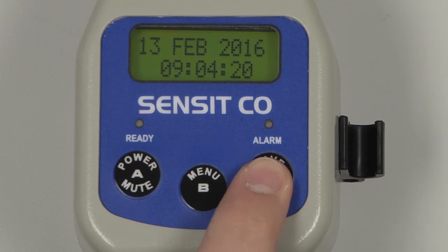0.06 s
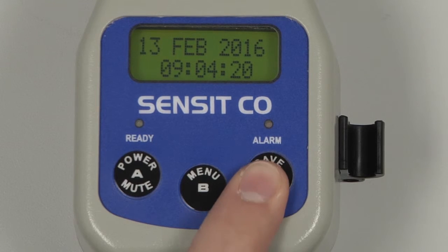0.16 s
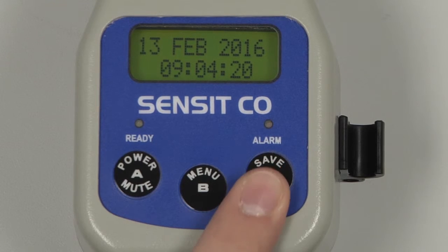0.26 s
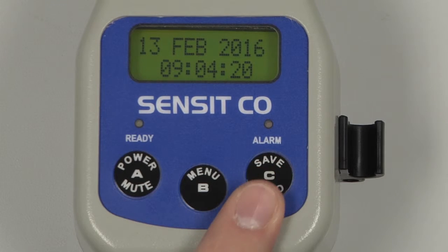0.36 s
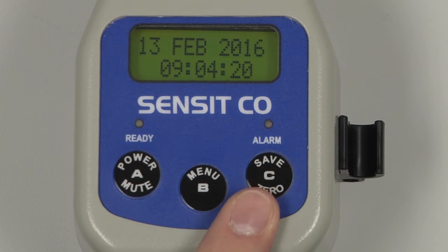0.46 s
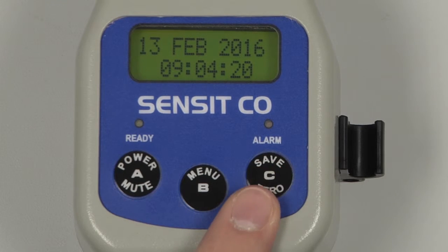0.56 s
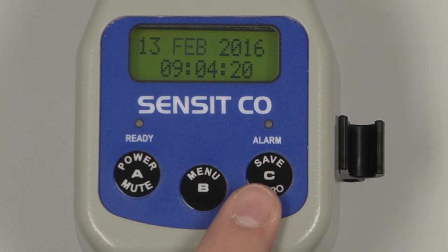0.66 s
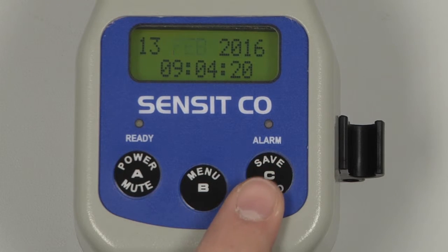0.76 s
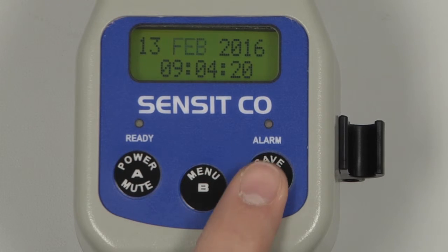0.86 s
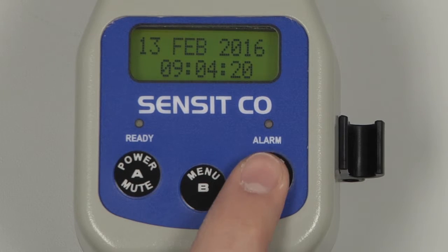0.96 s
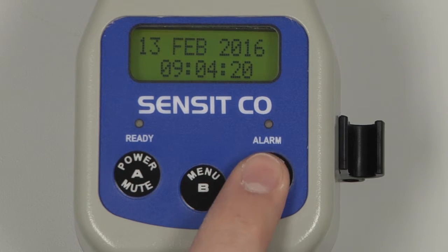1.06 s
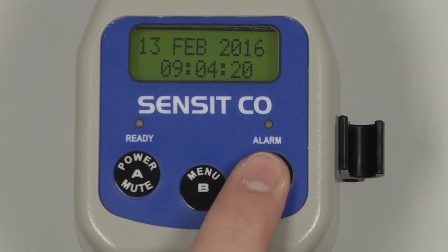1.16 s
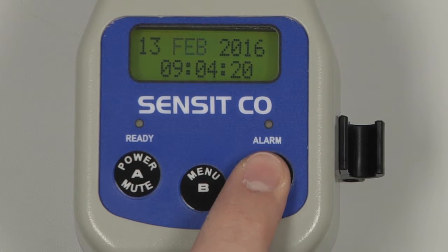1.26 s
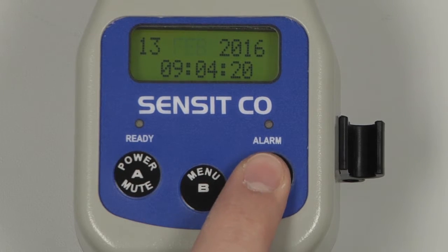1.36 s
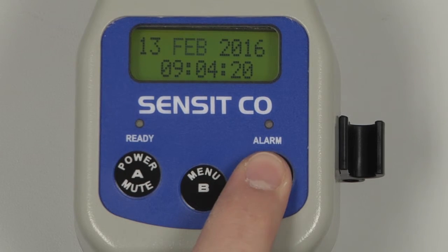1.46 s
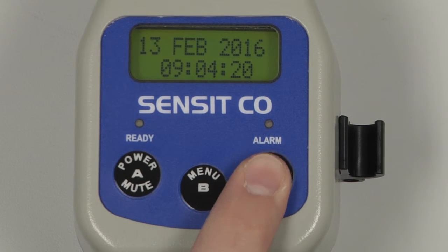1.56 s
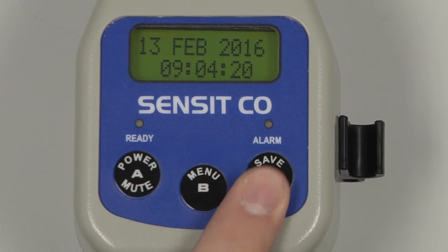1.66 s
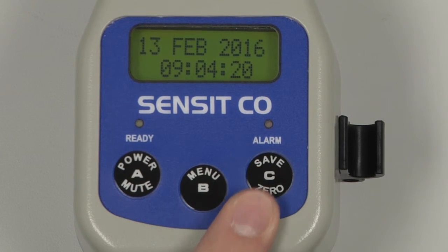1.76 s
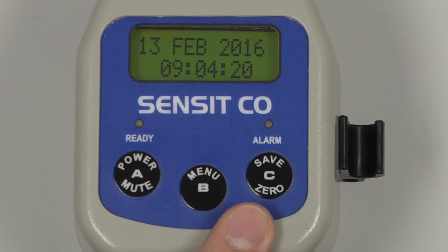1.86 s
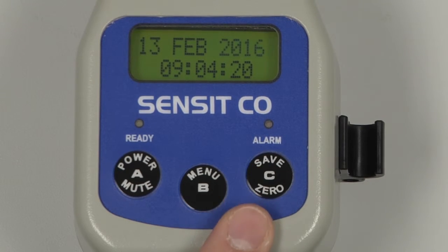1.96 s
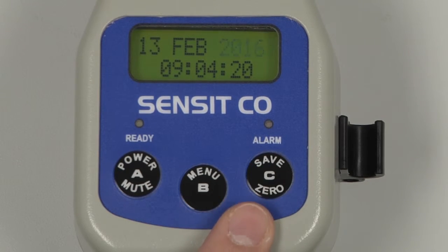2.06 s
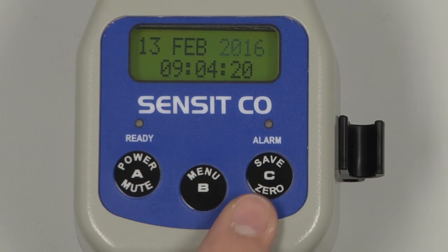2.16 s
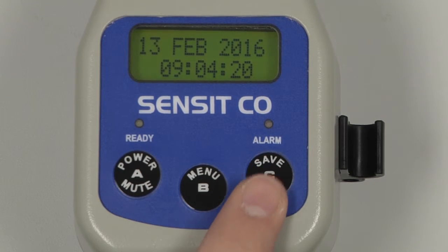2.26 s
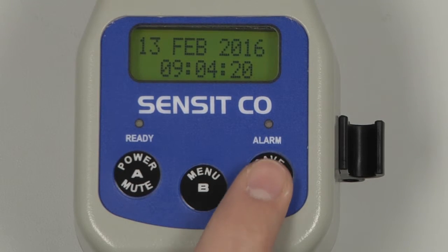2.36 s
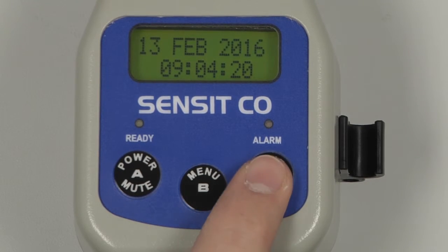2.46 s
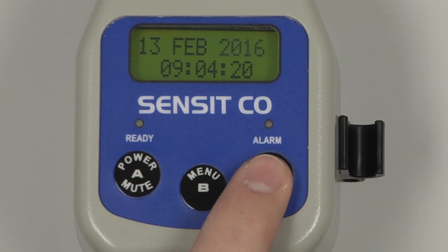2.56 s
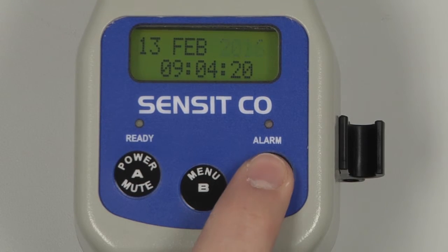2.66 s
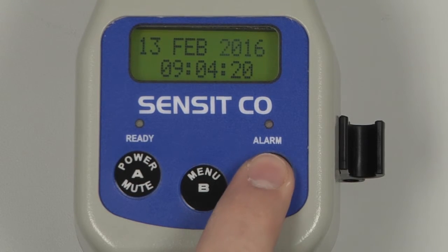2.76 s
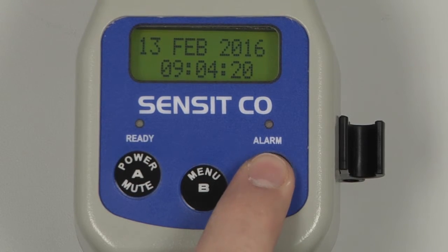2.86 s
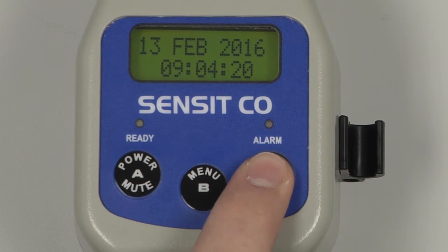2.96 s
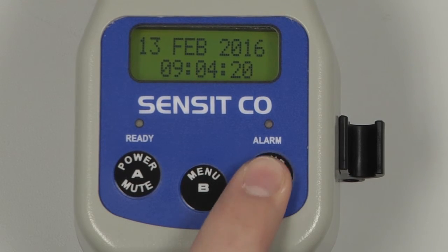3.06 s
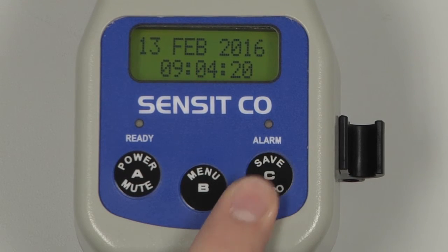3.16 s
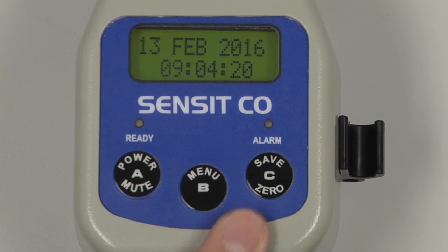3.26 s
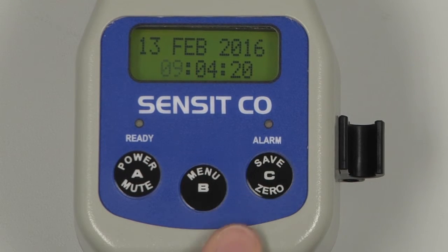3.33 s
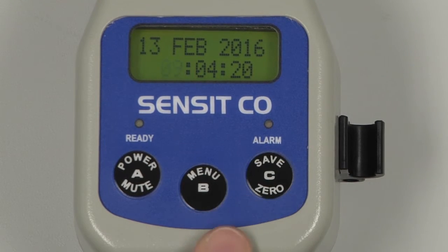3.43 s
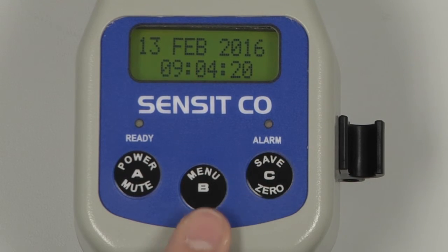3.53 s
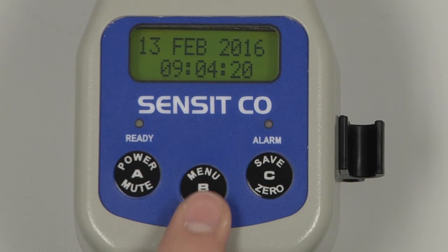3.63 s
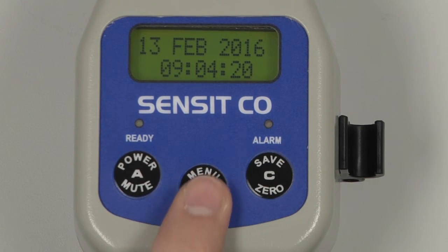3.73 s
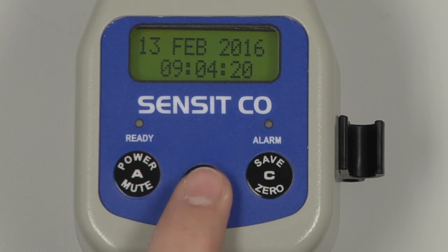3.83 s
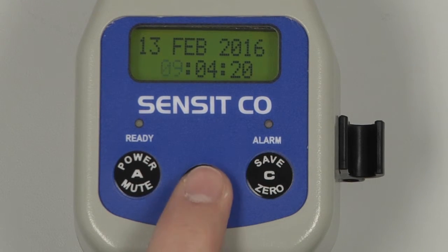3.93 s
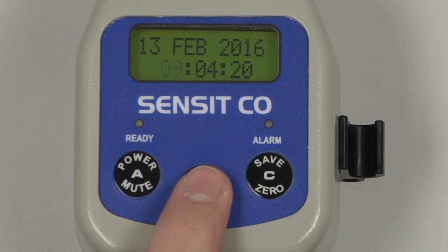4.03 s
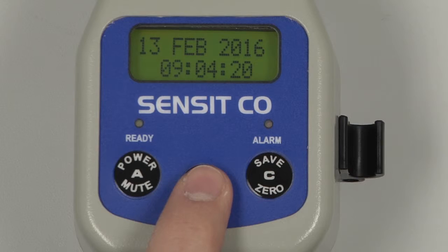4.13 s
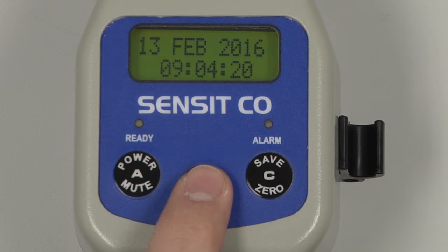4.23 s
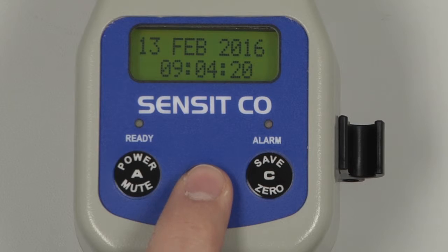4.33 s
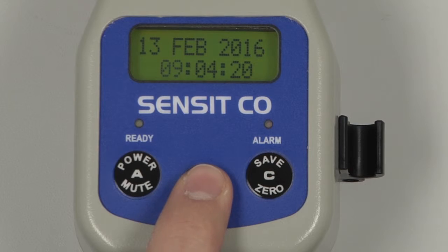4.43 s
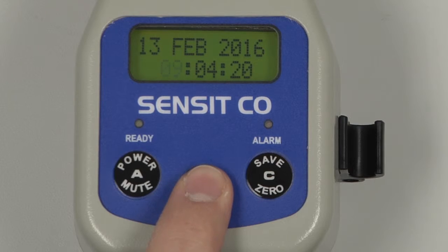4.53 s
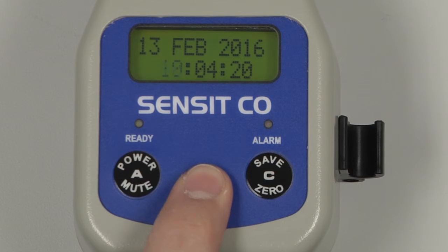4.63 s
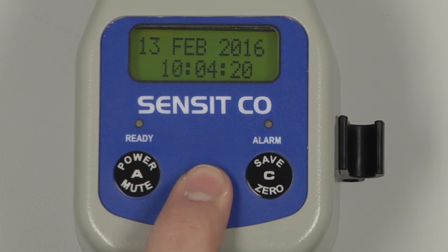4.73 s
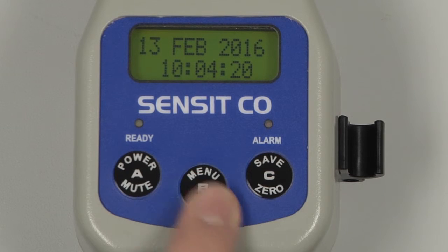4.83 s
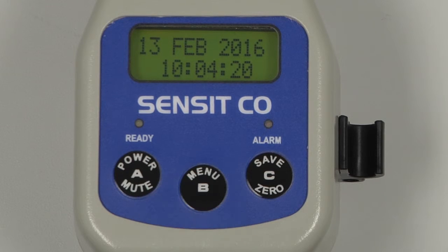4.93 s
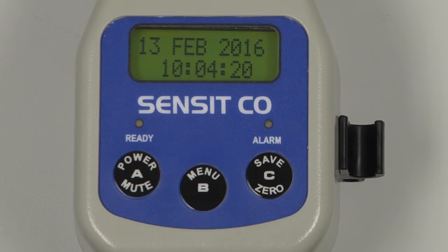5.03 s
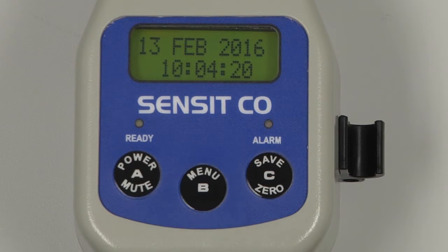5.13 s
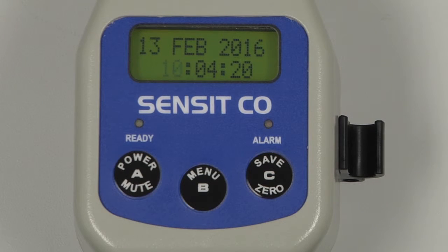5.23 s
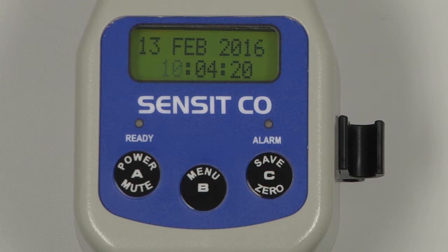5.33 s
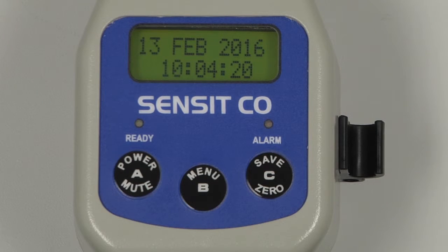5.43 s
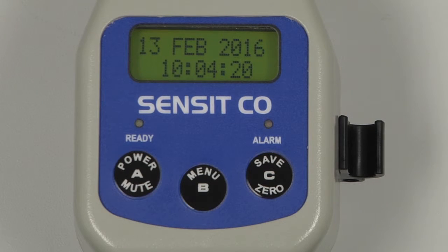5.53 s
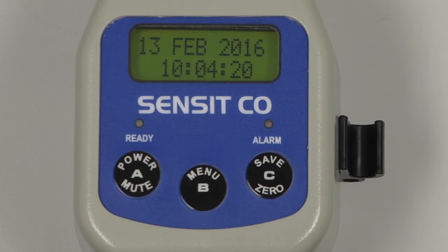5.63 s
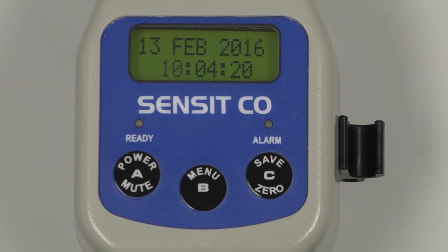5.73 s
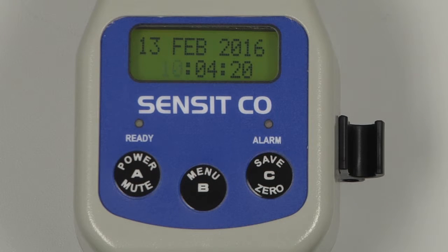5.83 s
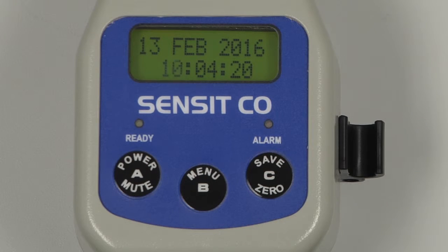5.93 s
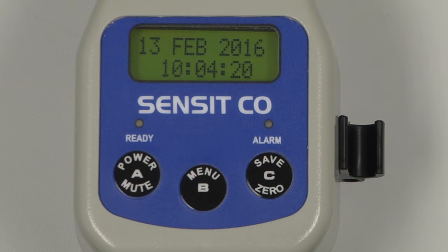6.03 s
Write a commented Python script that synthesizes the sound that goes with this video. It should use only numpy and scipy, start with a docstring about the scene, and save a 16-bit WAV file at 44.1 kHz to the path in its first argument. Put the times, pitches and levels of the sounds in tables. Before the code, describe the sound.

Four close, sharp button clicks come at a slow, even pace from a small plastic device, each ringing briefly in a small room and followed by a softer, duller knock as the button springs back. A faint hand rustle follows the first press, and more rustling and a few tiny ticks follow the last. Underneath, a small motor buzzes steadily, with mains hum, light hiss and a low rumble.

```python
"""From the start a small motor hums and buzzes over mains hum, air hiss and a deep rumble.
Almost at once a fingertip, close by, presses a dome button of a small plastic instrument: the dome
snaps down with a sharp click, a small room rings briefly, and the dome comes back with a soft
double knock. The hand rustles faintly and three more presses follow, about 1.5 s apart.
At the end the hand rustles away and a few thin ticks sound."""
import sys
import numpy as np
from scipy import signal
from scipy.fft import rfft, irfft, next_fast_len
from scipy.io import wavfile

SR = 44100
rng = np.random.default_rng(int(sys.argv[2]) if len(sys.argv) > 2 else 0)


def dump_mix(stems):
    """Bounce the given channels to the path in sys.argv[1] as a 16-bit WAV at rate SR."""
    frames = np.atleast_2d(stems).T  # one column per channel
    limited = np.clip(frames, -1, 1)  # hard clip at full scale
    pcm = np.round(limited * 32767).astype(np.int16)
    wavfile.write(sys.argv[1], SR, pcm)


N = 268613
MOTOR_HZ, MAINS_HZ, BEATING_HZ = 107.61, 59.93, 109.55

# the motor's strongest partials: (harmonic number, level [dB])
MOTOR_PEAKS = [(1, -58.5), (2, -56), (5, -54.5), (7, -59.5), (12, -54.5), (14, -62.5)]
# envelopes of its other partials, low, middle and high: (frequency [Hz], level [dB])
MOTOR_HUM = [(320, -71), (1076, -67), (1184, -72.5), (1390, -67), (1720, -71)]
MOTOR_WHINE = [(1830, -80.5), (1950, -76.5), (2360, -87.5), (2470, -75), (3120, -78)]
MOTOR_BUZZ = [(3200, -101), (3550, -84.5), (4000, -98.5), (4800, -84), (5100, -96), (5400, -82.5),
              (6400, -83), (6800, -88), (8500, -97)]
# mains hum, and a faint hum that beats against the motor: (harmonic number, level [dB])
MAINS_PARTIALS = [(1, -65), (2, -63), (6, -77.5), (8, -72), (14, -77), (20, -76.5)]
BEATING_PARTIALS = [(6, -85), (7, -71.5), (8, -78.5)]
# moving air, and the rumble of the building: (frequency [Hz], spectral density [dB per Hz])
AIR_SPECTRUM = [(130, -86), (230, -88), (400, -94), (650, -94.5), (950, -93), (1500, -97.5), (1900, -104),
                (3000, -104.5), (3600, -106), (5050, -106), (5400, -100.5), (5800, -103.5), (6250, -100.5),
                (6600, -104.5), (7600, -108), (11000, -110.7), (16000, -111)]
RUMBLE_SPECTRUM = [(4, -76), (10, -71.5), (17, -49.5), (27, -60), (36, -62.5), (50, -74), (80, -79),
                   (120, -89), (250, -115), (1000, -160)]
# the dome lands: (time [s], level [dB])
DOME_LANDINGS = [(0.01748, -0.8), (1.44927, 0.4), (2.89433, 0.3), (4.64503, 0.0)]
# the dome buckling just before it lands: (frequency [Hz], gain [dB])
BUCKLE_SPECTRUM = [(200, -14.5), (700, -4.5), (1600, -4), (4200, -8), (5100, -14.5), (6400, -1.5),
                   (7700, -19), (8600, -12.5), (12000, -13.5), (16000, -21)]
# modes of the plastic case: (frequency [Hz], half-width [Hz], gain [dB])
CASE_MODES = [(356, 20, 7), (564, 60, -10), (836, 152, 16.5), (1169, 86, 9), (1620, 590, 7),
              (2250, 330, 7.5), (2736, 180, 10.5), (3000, 180, 13.5), (3690, 350, 0.5), (5500, 430, -4.5),
              (6370, 330, 2), (7300, 460, 0.5), (8950, 900, -24), (10800, 680, -15.5)]
# the button knocking on its stop: (frequency [Hz], gain [dB])
KNOCK_SPECTRUM = [(60, -13), (170, 3.5), (350, 1.5), (500, -4), (720, 0.5), (1200, -26.5), (2500, -44),
                  (10000, -78)]
# early reflections from the walls: (delay [s], gain [dB])
WALL_ECHOES = [(0.0096, -28), (0.0105, -20.5), (0.015, -18.5), (0.018, -16), (0.0322, -20)]
# decay of the room's tail: (frequency [Hz], reverberation time [s])
TAIL_T60 = [(150, 0.85), (400, 0.4), (850, 0.27), (1400, 0.28), (2900, 0.31), (4000, 0.25), (7500, 0.32),
            (15000, 0.2)]
# colour of that tail: (frequency [Hz], gain [dB])
TAIL_SPECTRUM = [(120, -2), (350, 1.5), (850, -10), (1500, -5.5), (2200, -11.5), (2750, -6), (3100, -19),
                 (3500, -3), (4200, -5.5), (6200, -12), (7500, -6), (11000, -7.5), (15000, -24)]
# the dome returns: (time [s], spring level [dB], knock level [dB])
DOME_RETURNS = [(0.1584, -11.5, -2.5), (1.5878, -6, -7), (3.0408, -12, -0.5), (4.788, -9.5, 0)]
# the dome springing back: (frequency [Hz], gain [dB])
SPRING_SPECTRUM = [(80, -4.5), (300, 2), (800, 2.5), (1300, -4), (2000, -16), (3000, -13), (4500, -33),
                   (12000, -53)]
# hand and sleeve move: (centre time [s], half-length [s], gain [dB])
HAND_MOVES = [(1.06, 0.07, -8), (5.251, 0.24, -8), (5.573, 0.06, -1)]
# their friction: (frequency [Hz], spectral density [dB per Hz])
FRICTION_SPECTRUM = [(1500, -125), (4000, -108), (8000, -103), (11000, -107), (16000, -120)]
# stray ticks: (time [s], frequency [Hz], half-width [Hz], ring level [dB], crack level [dB])
STRAY_TICKS = [(5.409, 1560, 300, -11.5, -46), (5.7546, 7260, 1000, -8, -22.5),
               (5.8210, 3000, 500, -25, -40), (5.9800, 3500, 220, -20, -46)]


def gain_of(db):
    """Amplitude ratio: tenfold for every 20 dB."""
    return 10 ** (np.asarray(db) / 20)


def curve(points, hz):
    """Linear interpolation of a table on a logarithmic frequency axis."""
    table_hz, value = np.transpose(points)
    return np.interp(np.log(hz + 1), np.log(table_hz + 1), value)


def add(mix, s, sound):
    """Superposition: a sound joins the mix at time s."""
    part = mix[max(round(s * SR), 0):][:len(sound)]
    part += sound[:len(part)]


def bins(size=4096):
    """Frequencies of the discrete Fourier transform, in Hz."""
    return np.fft.rfftfreq(size, 1 / SR)


def drift(rate_hz):
    """Random modulation: low-passed noise of unit variance."""
    size = next_fast_len(N)
    x = irfft(rfft(rng.standard_normal(size)) / (1 + (bins(size) / rate_hz) ** 4), size)[:N]
    return x / x.std()


def hum(hz, partials, wander, flutter_db, groups=6):
    """A harmonic series, slightly modulated: in frequency as a whole, in amplitude by groups."""
    cycles = np.cumsum(hz * (1 + wander * drift(1.29))) / SR
    flutter = [gain_of(flutter_db * drift(4.0)) for _ in range(groups)]
    tones = (gain_of(db) * flutter[i % groups] * np.sin(2 * np.pi * (round(k) * cycles + rng.random()))
             for i, (k, db) in enumerate(partials))
    return np.sqrt(2) * sum(tones)


def motor(knee_hz=1780, even_db=-3.0, uneven_db=0.5):
    """Periodic rotation radiates harmonics: a hum, above the knee a mainly odd whine, then a buzz."""
    low, high = np.arange(1, 30), np.arange(30, 80)
    hz = low * MOTOR_HZ
    whine_db = curve(MOTOR_WHINE, hz) + even_db * (low % 2 == 0)
    low_db = np.where(hz < knee_hz, curve(MOTOR_HUM, hz), whine_db)
    for k, db in MOTOR_PEAKS:
        low_db[round(k) - 1] = db
    scatter_db = uneven_db * rng.uniform(-np.sqrt(3), np.sqrt(3), len(high))
    buzz_db = curve(MOTOR_BUZZ, high * MOTOR_HZ) + scatter_db
    partials = zip(np.r_[low, high], np.r_[low_db, buzz_db])
    return hum(MOTOR_HZ, partials, wander=0.000292, flutter_db=0.5)


def noise(spectrum):
    """Stationary noise: white noise filtered to the given spectral density."""
    size = next_fast_len(N)
    shaped = rfft(rng.standard_normal(size)) * gain_of(curve(spectrum, bins(size)))
    return irfft(shaped, size)[:N] * np.sqrt(SR / 2)


def impulse_response(gain):
    """Minimum phase: the causal ring that a sharp blow leaves in a body of this frequency response."""
    log_gain = np.log(np.maximum(np.r_[gain, gain[-2:0:-1]], 1e-5))
    return np.fft.ifft(np.exp(np.conj(signal.hilbert(log_gain)))).real


def resonances(modes):
    """Damped modes add in power to give a body's frequency response."""
    peaks = (gain_of(db) / (1 + ((bins() - hz) / width) ** 2) for hz, width, db in modes)
    return np.sqrt(sum(peak ** 2 for peak in peaks))


def diffuse(size=1024, passes=4):
    """Spectral whitening: one second of random-phase noise in which no pitch stands out."""
    x = rng.standard_normal(SR + 2 * size)
    for _ in range(passes):
        spectra = signal.stft(x, nperseg=size)[2]
        x = signal.istft(np.exp(1j * np.angle(spectra)))[1]
    return x[size:size + SR] / x.std()


def presses(lead_s=0.0025, chatter_s=0.0019, buckle_db=-0.5, stop_s=0.00544):
    """Snap-through buckling: the dome chatters, lands and rings the case; the button hits its stop."""
    out, t = np.zeros(N), np.arange(128) / SR
    # group delay: the upper modes of the case answer later than the lower ones
    lag_s = np.interp(bins(), [2500, 6000], [0, 0.0004])
    dispersion = np.exp(-2j * np.pi * np.cumsum(lag_s) * bins()[1])
    ring = irfft(rfft(impulse_response(resonances(CASE_MODES))) * dispersion)[:1024]
    buckling = impulse_response(gain_of(curve(BUCKLE_SPECTRUM, bins()) + buckle_db))
    knock = impulse_response(gain_of(curve(KNOCK_SPECTRUM, bins())))
    for s, db in DOME_LANDINGS:
        chatter = diffuse(size=64)[:len(t)] * np.exp(-t / chatter_s)
        chatter /= np.linalg.norm(chatter)
        add(out, s - lead_s, gain_of(db) * np.convolve(chatter, buckling))
        add(out, s, gain_of(db) * bench(ring))
        add(out, s + stop_s, gain_of(db) * knock)
    return out


def room(x, onset_s=0.0011, build_s=0.00046):
    """Reverberation: early wall reflections and a diffuse tail, each band decaying at its own rate."""
    hz, t, spectra = signal.stft(diffuse(), SR, nperseg=256)
    decay = np.log(1000) / np.maximum(curve(TAIL_T60, hz), 0.02)[:, None]
    unit_energy = np.sqrt(2 * decay / SR)
    colour = gain_of(curve(TAIL_SPECTRUM, hz))[:, None]
    response = signal.istft(spectra * unit_energy * np.exp(-decay * t) * colour, SR)[1]
    age_s = np.maximum(np.arange(len(response)) / SR - onset_s, 0)
    response *= 1 - np.exp(-age_s / build_s)
    for s, db in WALL_ECHOES:
        add(response, s, gain_of([db]))
    return signal.fftconvolve(x, response)[:N]


def bench(x, delay_s=0.002277, reflection=0.66):
    """Specular reflection: the hard bench top adds a delayed, weaker copy."""
    out = x.copy()
    add(out, delay_s, reflection * x)
    return out


def releases(travel_s=0.00658, pop=0.97, rattle=0.061, rattle_s=0.023):
    """Elastic recoil: the finger-damped dome pops back and rattles; the button hits its stop."""
    out, t = np.zeros(N), np.arange(2048) / SR
    spring = impulse_response(gain_of(curve(SPRING_SPECTRUM, bins())))
    knock = impulse_response(gain_of(curve(KNOCK_SPECTRUM, bins())))
    for s, spring_db, knock_db in DOME_RETURNS:
        force = rattle * rng.standard_normal(len(t)) * np.exp(-t / rattle_s)
        force[0] = -pop
        add(out, s, gain_of(spring_db) * signal.fftconvolve(force, spring))
        add(out, s + travel_s, gain_of(knock_db) * knock)
    return out


def rustles(grain_db=1.5):
    """Sliding friction: hand and sleeve make grainy noise in soft Gaussian swells."""
    t = np.arange(N) / SR
    swell = sum(gain_of(db) * np.exp(-((t - s) / half_s) ** 2) for s, half_s, db in HAND_MOVES)
    return swell * gain_of(grain_db * drift(80)) * noise(FRICTION_SPECTRUM)


def ticks(crack_hz=6500, crack_width_hz=5500):
    """Impulse excitation: each tick is one briefly ringing mode and a faint broadband crack."""
    out = np.zeros(N)
    for s, hz, width, ring_db, crack_db in STRAY_TICKS:
        modes = [(hz, width, ring_db), (crack_hz, crack_width_hz, crack_db)]
        add(out, s, impulse_response(resonances(modes)))
    return out


def scene(tick_send_db=-9.0):
    """Superposition: buttons and ticks excite the room, over dry rustles, hums and noise."""
    buttons, ticking = presses() + releases(), ticks()
    clicks = buttons + ticking + room(buttons + gain_of(tick_send_db) * ticking)
    mains = hum(MAINS_HZ, MAINS_PARTIALS, wander=0.0001, flutter_db=0.8)
    beating = hum(BEATING_HZ, BEATING_PARTIALS, wander=0.0005, flutter_db=1.0)
    mix = clicks + rustles() + motor() + mains + beating + noise(AIR_SPECTRUM) + noise(RUMBLE_SPECTRUM)
    return mix[None]


def record(dry, cutoff_hz=16000):
    """Band limiting: a zero-phase low-pass filter removes the highest treble."""
    low_pass = signal.firwin(401, cutoff_hz, window=("kaiser", 9), fs=SR)
    return signal.filtfilt(low_pass, 1, dry)


dry = scene()
out = record(dry)
dump_mix(out)
```